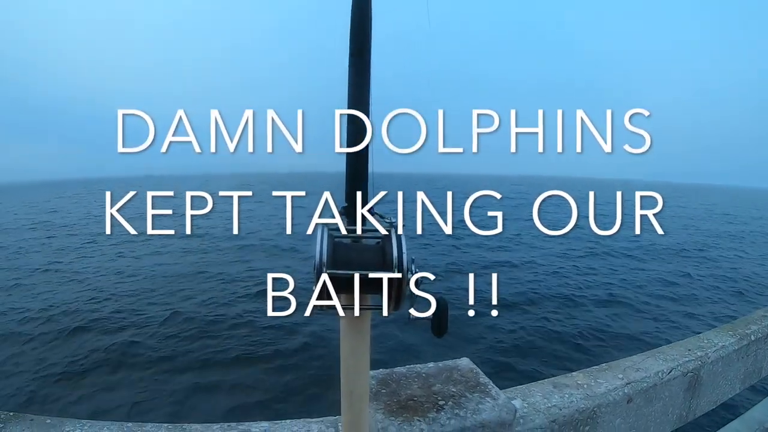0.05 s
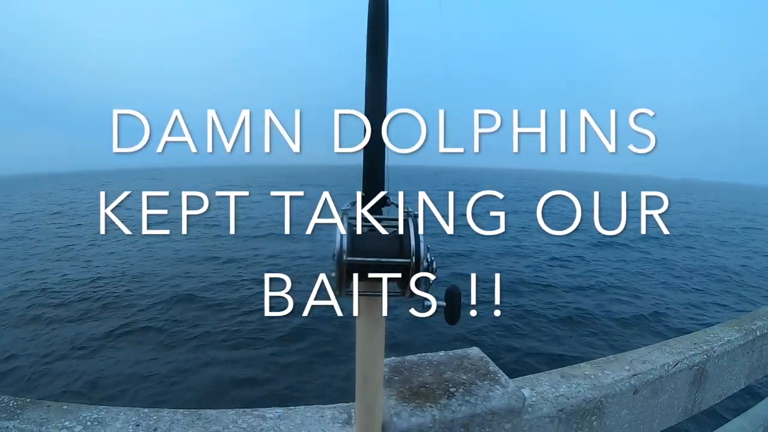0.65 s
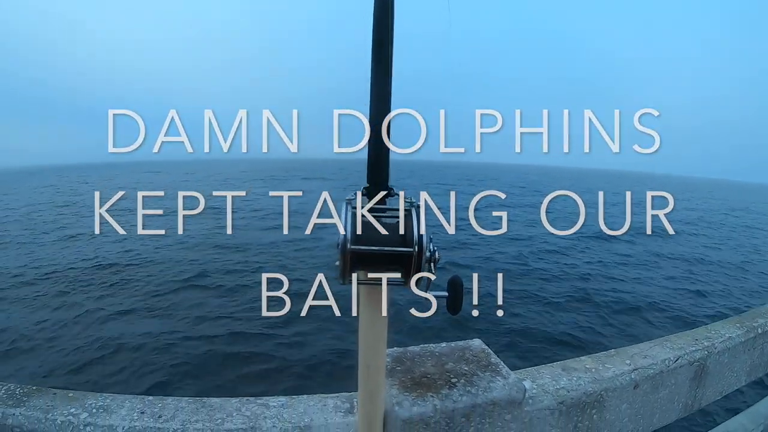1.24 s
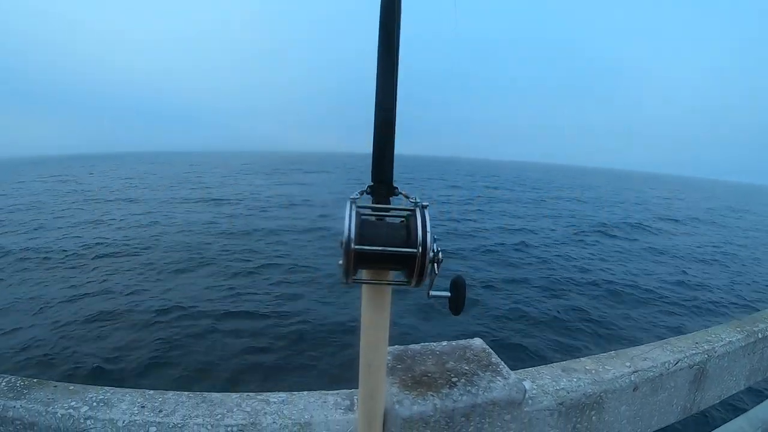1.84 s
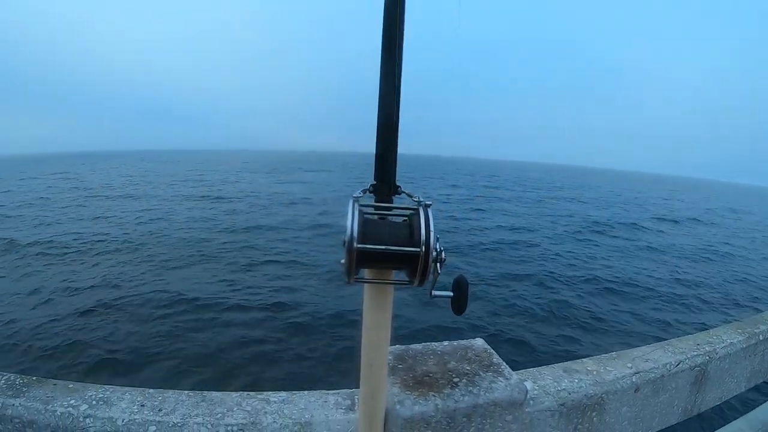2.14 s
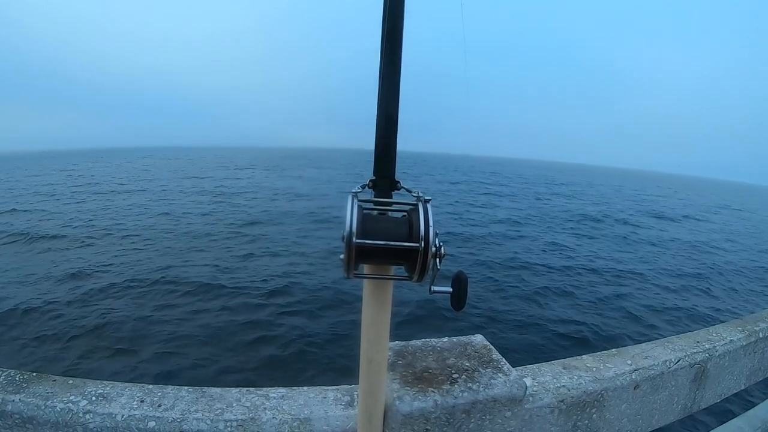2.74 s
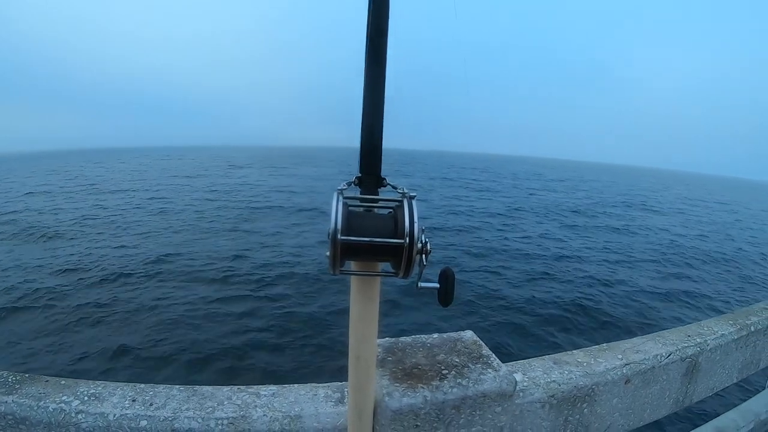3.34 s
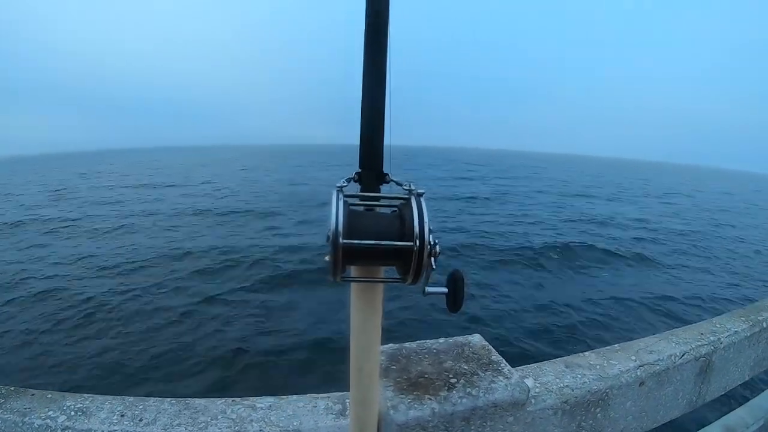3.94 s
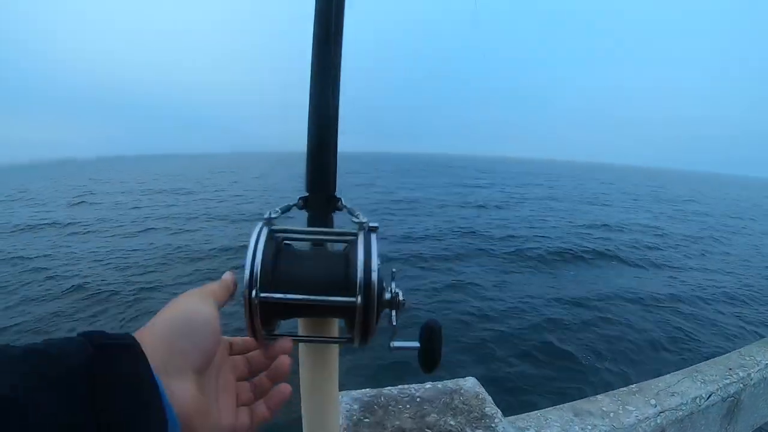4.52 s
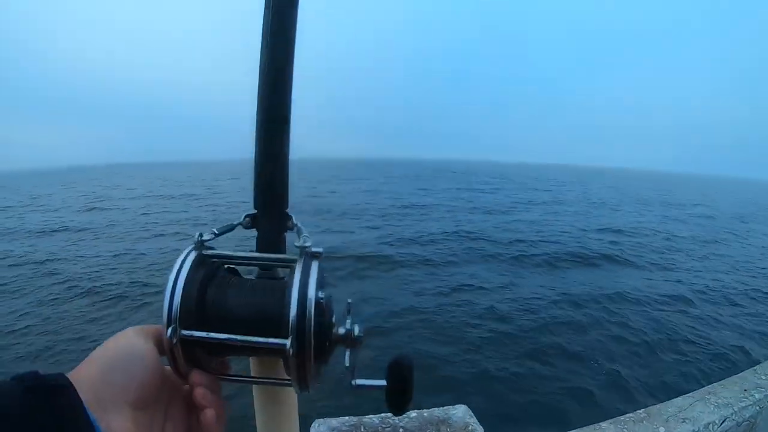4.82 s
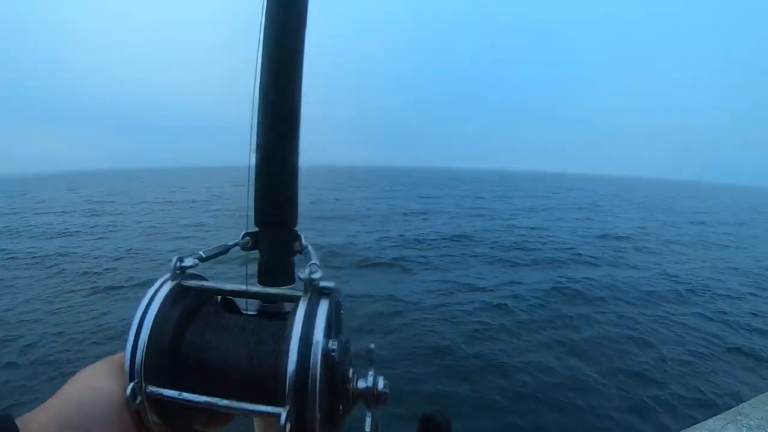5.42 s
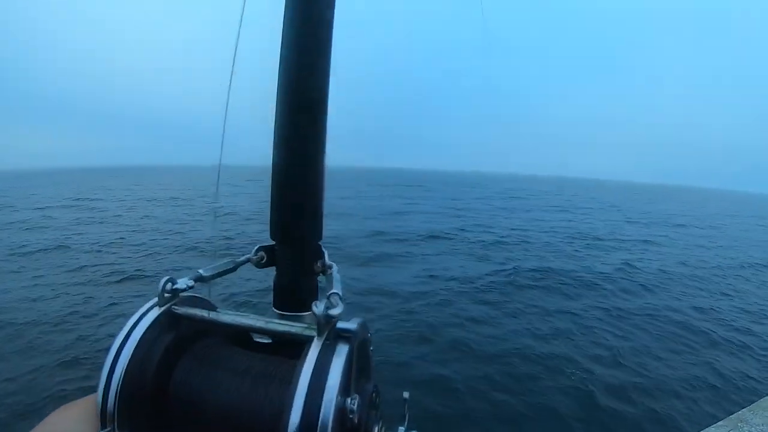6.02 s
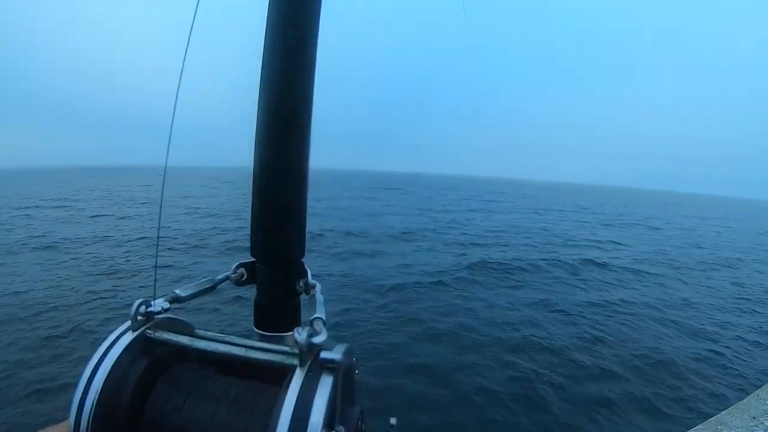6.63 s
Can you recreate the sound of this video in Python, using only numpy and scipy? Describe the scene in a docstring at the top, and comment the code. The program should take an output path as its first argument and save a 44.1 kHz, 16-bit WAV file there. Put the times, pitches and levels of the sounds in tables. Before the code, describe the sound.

A large fishing reel's ratchet buzzes in fast runs as line is pulled off, with wind rumble and faint sea wash.

```python
"""A big trolling reel gives line in three runs: its steel pawl snaps over the spool's ratchet teeth.
Each snap rings the frame and side plate and knocks through the rod; the pier adds a faint echo.
The listener moves in close, so the clicks turn brighter. Around the second pause a hand rubs the reel.
Wind buffets the microphone and the sea washes below."""
import sys
import numpy as np
from scipy import signal
from scipy.fft import rfft, irfft, next_fast_len
from scipy.io import wavfile
from scipy.ndimage import uniform_filter1d, map_coordinates

SR = 44100
rng = np.random.default_rng(int(sys.argv[2]) if len(sys.argv) > 2 else 0)


def pcm_store(signal):
    """Save signal as 16-bit PCM."""
    levels = np.round(np.clip(np.atleast_2d(signal), -1, 1) * 32767)
    wavfile.write(sys.argv[1], SR, levels.astype(np.int16).T)


N = 294147
TIME = np.arange(N) / SR
TEETH = 14


def amp(db):
    """Decibels to gain."""
    return 10 ** (np.asarray(db) / 20)


def unit(x):
    """Scale to rms 1 along the last axis."""
    return x / np.sqrt(np.mean(x ** 2, axis=-1, keepdims=True) + 1e-20)


def along(points, hz):
    """Interpolate (frequency [Hz], value) points on a log axis."""
    knots_hz, values = np.transpose(points)
    return np.interp(np.log(hz + 1), np.log(knots_hz + 1), values)


def curves(rows, at=TIME):
    """Each value column of a time table, read at the given times."""
    knots_s, *columns = np.transpose(rows)
    return [np.interp(at, knots_s, column) for column in columns]


def wobble(rate_hz):
    """Smooth random curve through rate_hz knots a second."""
    return map_coordinates(rng.standard_normal(int(N * rate_hz / SR) + 4), [TIME * rate_hz])


def swells(rows):
    """Gaussian amplitude swells; length is the time above half power."""
    return np.sqrt(sum(amp(db) ** 2 * .5 ** ((2 * (TIME - peak_s) / length_s) ** 2)
                       for peak_s, length_s, db in rows))


def bell(hz, centre_hz, width_hz):
    """Resonance bump of height 1."""
    return 1 / (1 + (2 * (hz - centre_hz) / width_hz) ** 2)


def filtered(x, response):
    """Apply a gain given as a function of frequency."""
    size = next_fast_len(N + SR // 2)
    return irfft(rfft(x, size) * response(np.fft.rfftfreq(size, 1 / SR)), size)[..., :N]


def noise(spectrum):
    """Coloured noise of rms 1."""
    return unit(filtered(rng.standard_normal(N), lambda hz: amp(along(spectrum, hz))))


def causal(db):
    """Minimum-phase response of this magnitude: rings only after the blow."""
    cepstrum = irfft(np.log(amp(db)))
    half = cepstrum.shape[-1] // 2
    cepstrum[..., 1:half] *= 2
    cepstrum[..., half + 1:] = 0
    return np.exp(rfft(cepstrum))


# Wash loudness: (time [s], level [dB])
SEA_LEVEL = [(0, -45.5), (1.6, -44.5), (3.2, -44), (4.15, -44.5), (4.8, -55.5), (6.67, -52.5)]
# Wash spectrum: (frequency [Hz], level [dB])
SEA_SPECTRUM = [(100, -56), (350, -0.5), (650, -0.5), (1000, -3), (2000, -13.5), (4000, -22.5), (6000, -43),
                (10000, -51), (16000, -62)]


def sea():
    """Waves wash round the piles."""
    return amp(curves(SEA_LEVEL)[0] + wobble(5.6)) * noise(SEA_SPECTRUM)


# Gusts: (peak time [s], length [s], rumble level [dB])
WIND_GUSTS = [(.21, 0.3, -36), (.86, 0.15, -35), (1.12, .18, -45), (1.88, 0.24, -38.5), (2.68, 0.18, -36.5),
              (3.19, 0.14, -30), (3.7, 0.37, -35), (4.28, 0.097, -23.5), (4.69, 0.34, -28),
              (5.07, 0.16, -26.5), (5.41, 0.12, -35.5), (5.8, 0.096, -30), (6.27, 0.15, -43.5),
              (6.455, 0.032, -31.5)]
# Wind spectra: (frequency [Hz], level [dB])
RUMBLE_SPECTRUM = [(12, -15), (25, -1.5), (45, 3.5), (100, -1.5), (150, -9.5), (300, -63), (600, -90)]
FLUTTER_SPECTRUM = [(50, -22), (110, -5), (180, -1), (260, -12.5), (450, -23.5), (1000, -69), (3000, -88)]
# Eddy thumps: (time [s], peak level [dB], pitch [Hz])
EDDIES = [(0.504, -24, 210), (0.733, -19.5, 180.5), (0.884, -21.5, 142), (2.577, -19.5, 174),
          (3.174, -21, 89.7), (3.573, -17, 178), (4.321, -12.5, 158), (5.02, -18.5, 88),
          (5.787, -14.5, 194.3), (6.063, -10, 108), (6.271, -21, 64), (6.455, -20, 100)]


def wind(breeze_rumble_db=-48, breeze_flutter_db=-49, flutter_re_gust_db=-9.5):
    """Gusts on a light breeze drive a lumpy rumble and flutter; single eddies thump the microphone."""
    gust = swells(WIND_GUSTS)
    rumble = np.hypot(gust, amp(breeze_rumble_db))
    flutter = np.hypot(gust * amp(flutter_re_gust_db), amp(breeze_flutter_db))
    lumps = wobble(22)
    air = rumble * amp(2.2 * lumps) * noise(RUMBLE_SPECTRUM)
    air += flutter * amp(3.9 * lumps) * noise(FLUTTER_SPECTRUM)
    for peak_s, db, hz in EDDIES:
        cycles = (TIME - peak_s) * hz
        air += amp(db) * np.exp(-np.abs(cycles) / 0.47) * np.sin(2 * np.pi * (cycles + rng.random()))
    return air


def pier_echo(x, t60_s):
    """Short scatter from the rail and deck."""
    t = np.arange(SR // 4) / SR
    tail = unit(rng.standard_normal(len(t)) * amp(-60 * t / t60_s)) / np.sqrt(len(t))
    return signal.fftconvolve(x, tail)[:N]


# Hand strokes: (peak time [s], length [s], level [dB])
HAND_RUBS = [(4.93, 0.14, -46.5), (5.14, 0.08, -41.5), (5.34, 0.13, -49)]
# Skin friction: (frequency [Hz], level [dB])
SKIN_SPECTRUM = [(500, -30), (1100, 15), (2300, 9.5), (3600, 5.5), (5500, -10), (8500, -13), (12000, -40),
                 (16000, -40)]


def hand(squeak_s=4.981, squeak_hz=1360):
    """Skin rubs softly on the reel and squeaks once as the spool comes to rest."""
    envelope = amp(-27) * np.exp(-((TIME - squeak_s) / 0.0026) ** 2)
    squeak = envelope * np.sin(2 * np.pi * squeak_hz * TIME)
    return squeak + swells(HAND_RUBS) * noise(SKIN_SPECTRUM)


# Rod response: (frequency [Hz], level [dB])
ROD_SPECTRUM = [(100, -13), (240, -2), (380, 1.5), (520, 1), (700, 0.5), (1000, 15.5), (1600, -41),
                (3000, -83.5)]


def rod_knock(t, hz):
    """Each click sends the same dull knock through the rod; at speed the knocks merge into a buzz."""
    delay_to_snap = np.exp(2j * np.pi * hz * t[0])
    return unit(irfft(causal(along(ROD_SPECTRUM, hz)) * delay_to_snap))


def plate_ring(t, nearness, pitch_hz, t60_s):
    """The side plate rings after each snap, slightly higher close up."""
    after_s = np.maximum(t, 0)
    ring_hz = pitch_hz * (1 + 0.028 * nearness + 0.0027 * rng.standard_normal(nearness.shape))
    envelope = amp(-60 * after_s / t60_s) * (1 - np.exp(-after_s / 0.0037))
    return unit(envelope * np.sin(2 * np.pi * ring_hz * after_s))


def pawl_scrape(t, hz, pitch_hz, rise_s, width_hz):
    """The pawl sings as it climbs the next tooth, at a slightly new pitch each time."""
    swell = np.exp(-np.abs(t) / np.where(t < 0, rise_s, .004))
    centre_hz = pitch_hz * np.exp(.033 * rng.standard_normal(pitch_hz.shape))
    hiss = rfft(rng.standard_normal((len(centre_hz), len(t))))
    return unit(swell * irfft(hiss * bell(hz, centre_hz, width_hz)))


def pawl_blows(tooth, t, bounce_s, bounce_db, chatter_db, hold_s, chatter_t60_s,
               tail_db, tail_t60_s, fresh_db, bounces=4):
    """Pawl force, a row per click: snap, rebounds and a chatter that partly repeats each turn."""
    clicks = len(tooth)
    blows = np.zeros((clicks, len(t)))
    snap = np.searchsorted(t, 0)
    blows[:, snap] = 1
    # each tooth throws the pawl in its own way
    gaps_s = bounce_s * np.exp(.35 * rng.standard_normal((TEETH, bounces)))[tooth]
    landing = np.minimum(snap + (np.cumsum(gaps_s, axis=1) * SR).astype(int), len(t) - 1)
    rebounds = amp(bounce_db * np.arange(1, bounces + 1) + 1.2 * rng.standard_normal((clicks, bounces)))
    blows[np.arange(clicks)[:, None], landing] += rebounds
    # neighbouring teeth chatter alike
    pattern = unit(uniform_filter1d(rng.standard_normal((TEETH, len(t))), size=5, axis=0, mode="wrap"))
    grain = pattern[tooth] + amp(fresh_db) * rng.standard_normal(blows.shape)
    rise = np.exp(np.minimum(t, 0) / 0.0011)
    late_s = np.maximum(t - hold_s, 0)
    fade = amp(-60 * late_s / chatter_t60_s) + amp(tail_db - 60 * late_s / tail_t60_s)
    return blows + amp(chatter_db) * unit(grain * rise * fade) / np.sqrt(len(t))


# Pawl tip response: (frequency [Hz], level [dB])
TIP_SPECTRUM = [(6000, -50), (10000, -6), (12400, 0), (13700, -7), (14500, 0), (14900, -5), (16000, -7)]


def tip_tick(tooth, t, hz):
    """The pawl's steel tip skitters on the tooth with a thin tick."""
    skitter = pawl_blows(tooth, t, bounce_s=0.0015, bounce_db=-1.5, chatter_db=16, hold_s=.003,
                         chatter_t60_s=0.027, tail_db=-13, tail_t60_s=.1, fresh_db=2)
    return unit(irfft(rfft(skitter) * causal(along(TIP_SPECTRUM, hz))))


def shimmer_db(hz, nearness):
    """Narrow treble resonances shift over a few clicks, more deeply close up."""
    field = rng.standard_normal((len(nearness), len(hz)))
    field = uniform_filter1d(field, size=13, axis=1)
    field = uniform_filter1d(field, size=4, axis=0)
    return (1.95 + 0.5 * nearness) * unit(field) * along([(2000, 0.047), (4500, 1)], hz)


def blow_spectrum_db(blows, width_hz):
    """Smoothed power spectrum of each blow."""
    bins = max(int(width_hz * blows.shape[1] / SR), 1)
    power = uniform_filter1d(np.abs(rfft(blows)) ** 2, size=bins, axis=1)
    return 10 * np.log10(np.abs(power) + 1e-9)


# Frame slope at arm's length, halfway, close up: (frequency [Hz], level [dB])
FRAME_SLOPE_FAR = [(300.0, -27.5), (700.0, -28.5), (950.0, -19.5), (1600.0, -18.5), (2900.0, -2.5),
                   (4300.0, -14.5), (5600.0, -34), (6500.0, -54), (9400.0, -42.5), (11000.0, -40.5),
                   (15500.0, 8.5)]
FRAME_SLOPE_MID = [(300.0, -36), (700.0, -52), (950.0, -17.5), (1550.0, -25.5), (2900.0, -17),
                   (4500.0, -10.5), (5600.0, -22.5), (9400.0, -26), (11500.0, -38.5), (15500.0, -75)]
FRAME_SLOPE_NEAR = [(300.0, -57), (700.0, -14), (950.0, -13.5), (1600.0, -18.5), (2700.0, -9),
                    (5000.0, -17), (5700.0, -13.5), (8500.0, -21), (10300.0, -22.5), (12000.0, -32),
                    (15500.0, -40)]
# Frame resonances, same distances: (frequency [Hz], width [Hz], lift [dB])
FRAME_MODES_FAR = [(966, 64, 6.4), (1428, 98, 38), (1745.4, 117, 34.9), (2577, 74, 29), (3333, 454, 23.8),
                   (3916, 340, 16.5), (7530, 1070, 30.7), (9010, 1300, 26), (14900, 65, 4.2)]
FRAME_MODES_MID = [(1055, 162, 18.2), (1264, 367, 18.9), (1811, 423, 20.8), (2487, 930, 9.4),
                   (3280, 200, 11.7), (3880, 900, 6.5), (3990, 270, 8.5), (6860, 1700, 9.1)]
FRAME_MODES_NEAR = [(933, 290, 10.5), (1260, 650, 9.2), (1900, 400, 17.3), (2330, 300, 4.2),
                    (3040, 450, 10), (3550, 290, 8.9), (4750, 740, 12), (7240, 490, 16.6)]


def reel_response_db(hz, nearness, tooth, pawl_hz):
    """Resonances per click: the frame, blended by distance, plus the spool and the pawl spring."""
    frames = [(FRAME_SLOPE_FAR, FRAME_MODES_FAR), (FRAME_SLOPE_MID, FRAME_MODES_MID),
              (FRAME_SLOPE_NEAR, FRAME_MODES_NEAR)]
    frames_db = [along(slope, hz) + sum(lift * bell(hz, centre, width) for centre, width, lift in modes)
                 for slope, modes in frames]
    shares = np.maximum(1 - np.abs(nearness - np.arange(len(frames))), 0)
    # the spool's resonance slides down once a turn
    turn = ((tooth[:, None] - 6) % TEETH) / TEETH
    spool_db = 7 * (1 + nearness / 2) * (bell(hz, 1270 - 350 * turn, 292) - 1.15 * bell(hz, 1094, 344))
    spring_db = 2.5 * nearness * bell(hz, pawl_hz, 390)
    return shares @ np.array(frames_db) + spool_db + spring_db


def pawl_snap(tooth, t, hz, nearness, pawl_hz):
    """The pawl drops off a tooth and its blows ring the frame."""
    blows = pawl_blows(tooth, t, bounce_s=0.0014, bounce_db=-2, chatter_db=11.5, hold_s=0.0026,
                       chatter_t60_s=0.022, tail_db=-15, tail_t60_s=0.11, fresh_db=-3)
    colour_db = reel_response_db(hz, nearness, tooth, pawl_hz)
    # hard steel contact feeds every resonance: partly flatten the blow
    colour_db -= .3 * blow_spectrum_db(blows, width_hz=160)
    colour_db += along([(450, -7.5), (800, -9.0)], hz)
    # harder snaps are brighter
    hardness = 0.83 * rng.standard_normal(nearness.shape)
    colour_db += hardness * along([(3000, 0.19), (8000, 0.58)], hz)
    colour_db += shimmer_db(hz, nearness)
    return unit(irfft(rfft(blows) * causal(colour_db)))


# Spool speed in each run: (time [s], rate [teeth/s])
RUN_1_SPEED = [(0.027, 20.8), (0.14, 32.5), (0.37, 80.4), (0.48, 85.4), (0.76, 40.0), (0.9, 42.1),
               (1.12, 43.3), (1.44, 83.8), (1.61, 91.3), (1.89, 58.3), (2.02, 61.3), (2.41, 86.9),
               (2.75, 69.4), (3.12, 93.1), (3.49, 68.6), (3.62, 24.8)]
RUN_2_SPEED = [(3.956, 33.9), (4.05, 35.3), (4.14, 28.9), (4.41, 38.3), (4.63, 33.8), (4.87, 15.3),
               (5.03, 11.1)]
RUN_3_SPEED = [(5.371, 15.0), (5.54, 63.6), (5.66, 77.1), (5.83, 69.0), (6.07, 70.2), (6.33, 48.3),
               (6.67, 58.8)]
# Pull of the fish, one per run: (click gain [dB])
RUN_PULL_DB = [0, 1.5, 0]


def spool(usual_teeth_per_s=60):
    """One click per tooth turned: (time [s], speed [octaves re usual], pull [dB])."""
    rows = []
    for run, pull_db in zip((RUN_1_SPEED, RUN_2_SPEED, RUN_3_SPEED), RUN_PULL_DB):
        run_s = np.arange(run[0][0], run[-1][0], 1 / SR)
        teeth_turned = np.cumsum(curves(run, run_s)[0]) / SR
        click_s = np.interp(np.arange(int(teeth_turned[-1]) + 1), teeth_turned, run_s)
        speed_oct = np.log2(curves(run, click_s)[0] / usual_teeth_per_s)
        rows.append(np.column_stack([click_s, speed_oct, np.full(len(click_s), pull_db)]))
    return np.concatenate(rows)


# Listener's approach: (time [s], nearness [0 arm's length, 1 halfway, 2 close up])
NEARNESS = [(4.0, 0.72), (4.6, 0.8), (5.38, 1.24), (5.65, 1.56)]
# Pawl spring's singing scrape, wandering in pitch and loudest as the second run slows:
# (time [s], pitch [Hz], scrape level [dB re snap])
PAWL_SPRING = [(0, 3755, -17.5), (3.6, 3850, -19), (4.15, 3150, -8.5), (4.4, 3520, -10), (4.62, 4330, -16),
               (5.02, 4170, -1), (5.6, 3650, -15.5), (6.1, 3410, -13), (6.4, 3000, -9)]


def ratchet(click_samples=3072, click_db=-21.3, tick_lean_db=1.5, jitter_s=.00004, taper_s=.008):
    """Every tooth lifts and drops the pawl: scrape, snap, plate ring, rod knock and a stereo tick."""
    click_s, speed_oct, pull_db = spool().T[:, :, None]
    tooth = np.arange(len(click_s)) % TEETH
    click_s = click_s + jitter_s * rng.standard_normal(click_s.shape)
    t = (np.arange(click_samples) - click_samples // 3) / SR  # snap at t = 0
    hz = np.fft.rfftfreq(click_samples, 1 / SR)
    nearness = curves(NEARNESS, click_s)[0]
    pawl_hz, scrape_db = curves(PAWL_SPRING, click_s)

    snaps = pawl_snap(tooth, t, hz, nearness, pawl_hz)
    grip_db = 3 * rng.standard_normal(click_s.shape)
    scrapes = amp(scrape_db + grip_db) * pawl_scrape(t, hz, pawl_hz, rise_s=0.0048, width_hz=180)
    ring_db = -15 - 4 * nearness + 3 * rng.standard_normal(click_s.shape)
    rings = amp(ring_db) * plate_ring(t, nearness, pitch_hz=1735, t60_s=0.052)
    tick_db = -24.5 + 5 * speed_oct - 16 * nearness
    ticks = np.array([amp(tick_db + side * tick_lean_db) * tip_tick(tooth, t, hz) for side in (1, -1)])
    knocks = amp(-19.5 - 3.5 * nearness) * rod_knock(t, hz)

    level_db = click_db + pull_db - 0.18 * speed_oct + 1.3 * nearness
    level_db += 1.22 * rng.standard_normal(click_s.shape)
    gain = amp(level_db) * np.sqrt(.01 * SR / click_samples)  # energy referred to 10 ms
    taper = np.minimum(np.minimum(t - t[0], t[-1] - t) / taper_s, 1)
    clicks = (unit(snaps + scrapes + rings + knocks) + ticks) * taper * gain
    positions = np.maximum(np.round((click_s + t) * SR).astype(int), 0)
    return np.array([np.bincount(positions.ravel(), channel.ravel(), N)[:N] for channel in clicks])


def scene():
    """Stereo mix, all centred except the tip's tick, which leans left."""
    reel = ratchet()
    echo = amp(-18) * pier_echo(reel.mean(axis=0), t60_s=.08)
    return reel + echo + hand() + wind() + sea()


def record(dry, ceiling=.52, cutoff_hz=15780):
    """Soft-clip the highest peaks, then low-pass."""
    rounded = dry / (1 + np.abs(dry / ceiling) ** 6) ** (1 / 6)
    return filtered(rounded, lambda hz: hz < cutoff_hz)


dry = scene()
out = record(dry)
pcm_store(out)
```